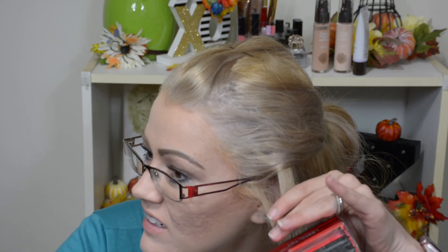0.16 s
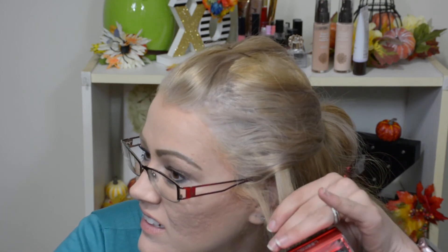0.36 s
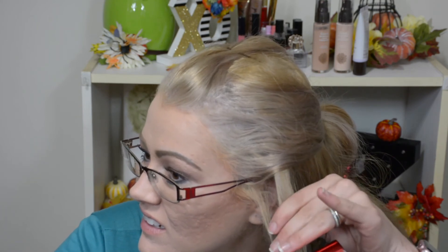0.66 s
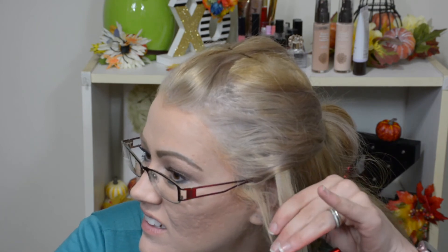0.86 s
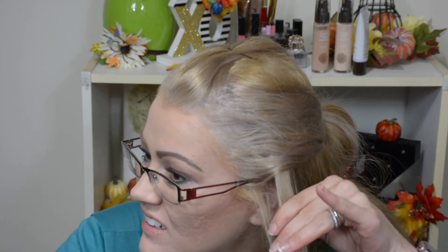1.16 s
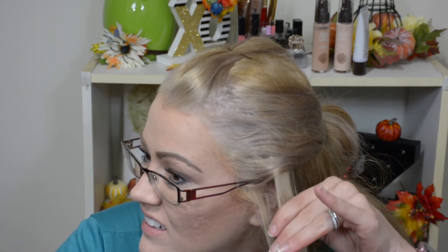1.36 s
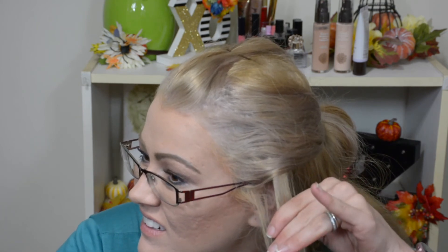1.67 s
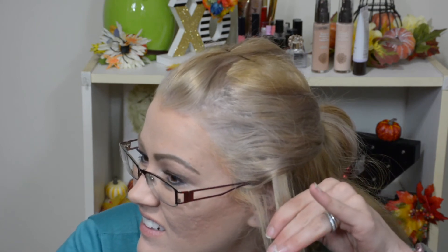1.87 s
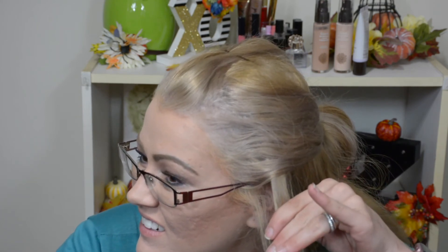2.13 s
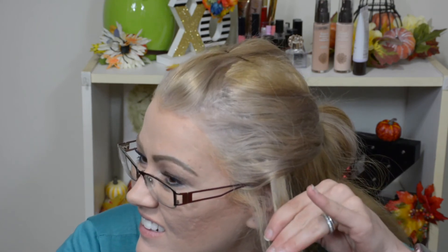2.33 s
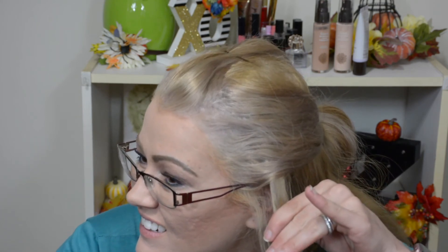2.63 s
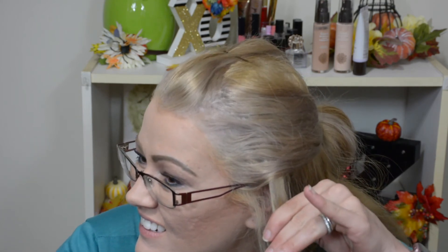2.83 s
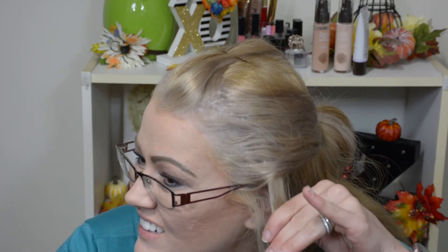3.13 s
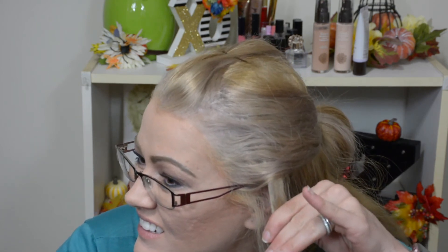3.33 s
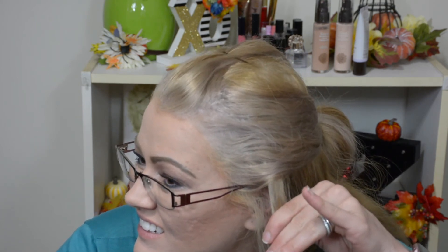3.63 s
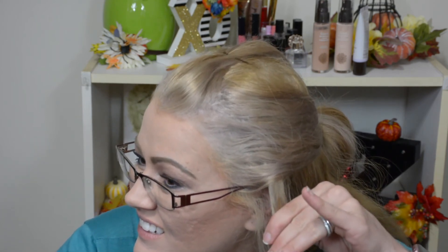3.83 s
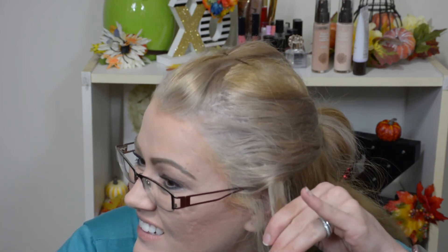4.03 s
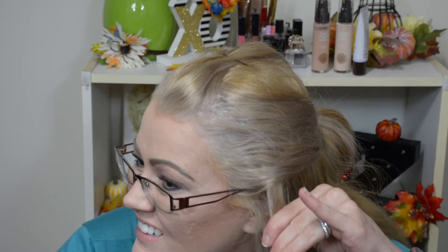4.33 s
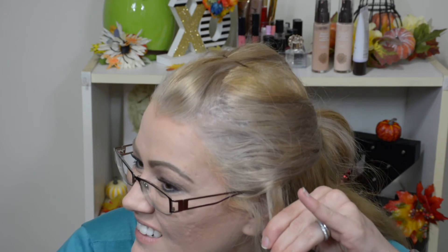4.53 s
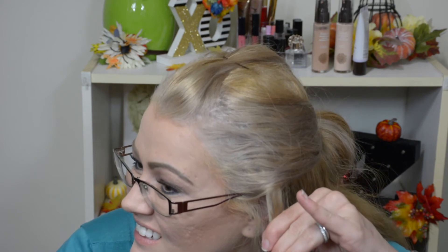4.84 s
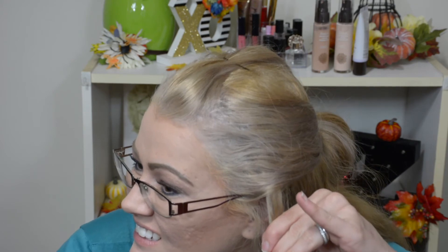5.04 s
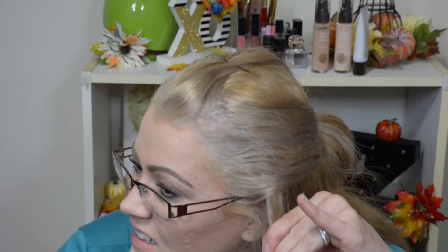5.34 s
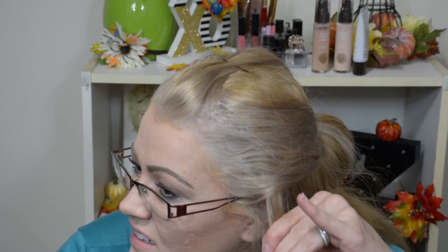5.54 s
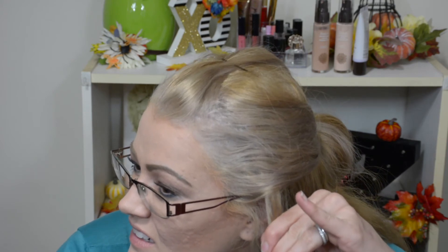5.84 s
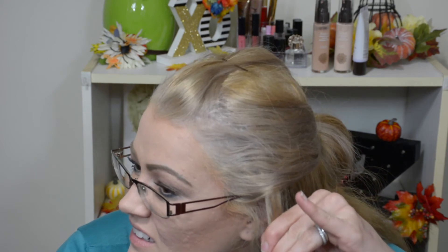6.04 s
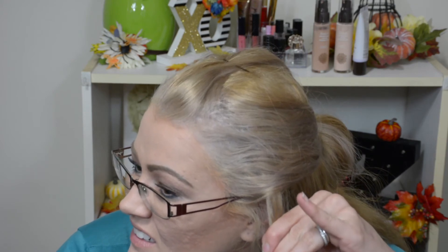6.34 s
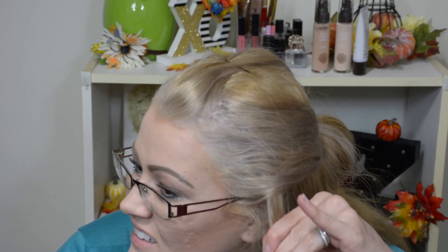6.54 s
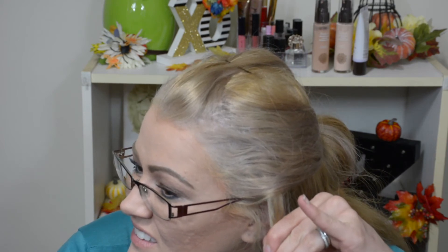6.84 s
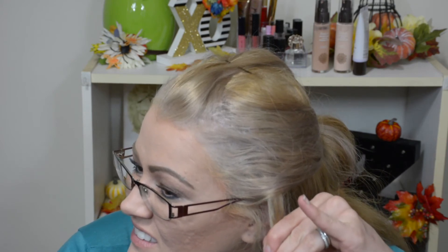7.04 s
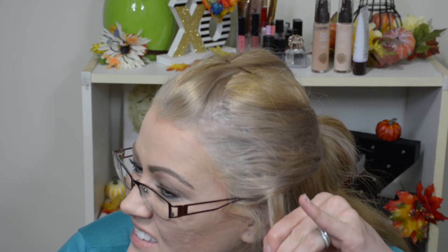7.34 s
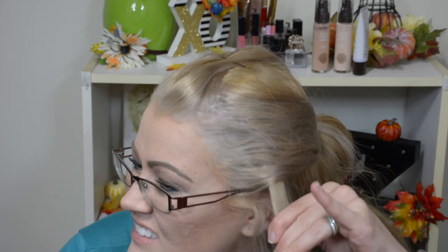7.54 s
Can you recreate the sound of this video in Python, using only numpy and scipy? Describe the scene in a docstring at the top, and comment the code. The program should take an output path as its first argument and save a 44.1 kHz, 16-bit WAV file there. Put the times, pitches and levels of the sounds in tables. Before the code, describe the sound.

A small cordless hair trimmer buzzes steadily with a bright, raspy whine in a quiet room, shifting slightly in tone as it is pressed and moved.

```python
"""A cordless hair trimmer hums and rasps in a quiet room with a rumble and a faint low hum that swells at times.
It runs free for the first second, is pressed to the neck by two, glides from four, tilts after six and lifts at
the end. A cam drives the blade to and fro, so every part hums on multiples of the stroke rate; gears add lines at
thirds and quarters, the teeth rasp three times a stroke and the blade knocks once.
The hold changes which multiples stand out and how loud each part is; the speed drifts along with it."""
import sys
import numpy as np
from scipy import signal
from scipy.fft import rfft, irfft, next_fast_len
from scipy.io import wavfile
from scipy.ndimage import uniform_filter1d, map_coordinates

SR = 44100
rng = np.random.default_rng(int(sys.argv[2]) if len(sys.argv) > 2 else 0)


def unload_audio(sound):
    """Save the sound as a 16-bit wav file, at the path given as the first command line argument."""
    columns = np.transpose(np.atleast_2d(sound))
    # keep every value between -1 and 1, then stretch to whole-number steps
    steps = np.round(np.clip(columns, -1, 1) * 32767)
    wavfile.write(sys.argv[1], SR, steps.astype(np.int16))


N = 339407
STROKES, POINTS = 12, 1024  # strokes in one full gear pattern, samples a stroke


def amp(db):
    """Turn dB into a plain factor."""
    return 10 ** (np.asarray(db) / 20)


def unit(x):
    """Scale x to an rms of 1."""
    return x / np.sqrt(np.mean(x ** 2) + 1e-20)


def steady(x, seconds):
    """Even out x to a running rms of 1."""
    return x / np.sqrt(np.abs(uniform_filter1d(x ** 2, int(seconds * SR))) + 1e-20)


def along(points, hz, column=1):
    """Read a table of (Hz, value, ..) on a log frequency axis."""
    p = np.transpose(points)
    return np.interp(np.log(hz + 1), np.log(p[0] + 1), p[column])


def curves(rows):
    """Draw one value per sample for each column after the time."""
    seconds, *columns = np.transpose(rows)
    return [np.interp(np.arange(N) / SR, seconds, c) for c in columns]


def wobble(rate):
    """A smooth random curve with rate knots a second."""
    return map_coordinates(rng.standard_normal(int(N * rate / SR) + 4), [np.arange(N) * rate / SR])


def filtered(x, response):
    """Shape the spectrum of x by a response that depends on frequency."""
    m = next_fast_len(N + 8192)
    return irfft(rfft(x, m) * response(np.fft.rfftfreq(m, 1 / SR)), m)[..., :N]


def coloured(x, spectrum):
    """Give x the spectrum of a table, at an rms of 1."""
    return unit(filtered(x, lambda hz: amp(along(spectrum, hz))))


# How fast the blade goes. Each row: time in seconds, speed in strokes per second.
SPEED = [(0.0, 67.7), (0.08, 67.8), (1.11, 67.8), (1.82, 67.1), (2.1, 65.8), (2.23, 65.6), (2.55, 66.1),
         (2.7, 65.4), (3.19, 66.0), (3.81, 65.2), (4.0, 66.4), (4.67, 67.3), (5.29, 66.6), (6.06, 67.3),
         (6.23, 67.2), (6.3, 66.4), (6.68, 66.3), (6.79, 66.8), (7.19, 66.2), (7.52, 66.7), (7.63, 66.1),
         (7.69, 66.1)]
RATE = np.mean(SPEED, axis=0)[1]  # average of the table, in strokes per second
WHEEL_TURNS = .246  # turns of the slow gear wheel a stroke
WHEEL_PLAY = .0009  # lead and lag it gives the blade, in strokes


def stroke_motion():
    """Count strokes over time; a slow gear wheel that runs out of true makes the blade lead and lag."""
    stroke = np.cumsum(curves(SPEED)[0] * (1 + .0003 * wobble(25))) / SR
    wheel = np.sin(2 * np.pi * WHEEL_TURNS * stroke)
    return stroke + WHEEL_PLAY * wheel, wheel


def played(table, stroke):
    """Loop a table of whole strokes in step with the blade."""
    return map_coordinates(table, [stroke * POINTS], mode="grid-wrap", order=1)


# How the tool is held. Each row: time in seconds, hold (0 free, 1 pressed, 2 gliding, 3 tilted, 4 lifted).
HOLD = [(1.1, 0), (1.88, .5), (1.96, 1.5), (3.85, 1), (4.05, 2), (6.2, 2), (6.32, 3), (7.54, 3), (7.59, 4)]


def shares():
    """How much of each of the five holds is heard, blending between neighbours."""
    hold, = curves(HOLD)
    return np.clip(1 - np.abs(hold - np.arange(len(KNOCK))[:, None]), 0, 1)


# The cam's hum. Each row: multiple of the stroke rate, relative level in dB.
CAM = [(1, -47.0), (2, -48.5), (3, -45.5), (4, -45), (5, -35.5), (6, -31), (7, -21.5), (8, -30), (9, -22.5),
       (10, -24.5), (11, -27), (12, -35.5), (13, -28), (14, -22), (15, -23), (16, -17.0), (17, -10.5),
       (18, -15), (19, -12), (20, -21), (21, -8.5), (22, -8), (23, -12), (24, -12.5), (25, -9.5), (26, -7),
       (27, -7.5), (28, -7.5), (29, -10.5), (30, -10.5), (31, -11.5), (32, -16), (33, -8.5), (34, -15.5),
       (35, -10), (36, -11.5), (37, -5.5), (38, -17.5), (39, -12.5), (40, -14.5), (41, -20.5), (42, -15),
       (43, -18.5), (44, -21.5), (45, -4.5), (46, -7), (47, -14.5), (48, -13), (49, -4.5), (50, -11.5),
       (51, -3.5), (52, -6.5), (53, -17.5), (54, -18.5), (55, -8), (56, -5), (57, -11.5), (58, -15.5),
       (59, -10.5), (60, -27), (61, -17), (62, -11.5), (63, -11), (64, -19.5), (65, -21.5), (66, -18.5),
       (67, -12.5), (68, -24.5)]
# Multiples each hold lifts or damps, one list per hold. Each row: multiple of the stroke rate, change in dB.
SHIFTS = [
    [(7, 2.0), (11, -6.5), (21, 6), (22, 2), (26, -2.5), (27, -3.5), (30, -3.5), (31, 3), (36, -6), (42, 2),
     (43, 9), (44, 10.5), (49, 0), (54, 9), (56, -10), (57, 0.5), (63, -8), (68, 3)],
    [(10, 3.5), (11, 5), (16, -4.5), (20, -7.0), (21, -8.5), (22, -4.5), (25, 2), (27, 6.5), (32, -2),
     (33, -8.5), (36, -7.0), (40, 5), (45, -3), (46, -20), (52, 5.5), (53, -3), (54, -17), (55, 2.5)],
    [(9, 2), (10, -2.0), (14, 2.5), (15, 4.5), (19, 4), (20, 2), (21, 2.0), (22, -0.5), (24, -10.0),
     (25, -9.5), (26, 2.5), (29, -5), (43, 5), (45, 0.5), (51, 2.5), (53, -10), (55, -5), (58, 7)],
    [(7, -3), (8, 5.5), (9, -1.5), (11, 2.5), (12, 12), (16, 6.5), (18, -6), (19, 3.5), (23, 5.5), (24, -9),
     (25, -9), (33, -4), (40, 4.5), (50, -14), (51, 6), (52, -8), (61, 5.0), (64, 11.5)],
    [(12, 12), (18, 13.5), (20, 4), (21, -12), (26, -3), (27, -8.0), (34, -6.0), (38, 3), (42, -7.0),
     (45, -1), (48, 7), (49, 0), (50, 3.0), (55, 8), (56, -2.5), (57, 6), (62, -3), (67, -11.0)],
]


def held(shifts):
    """The cam's multiples as one hold colours them."""
    orders = np.array(CAM, float)
    k, db = np.transpose(shifts)
    orders[np.rint(k).astype(int) - 1, 1] += db
    return orders


def trend(orders, hz):
    """The broad outline of the multiples: their power averaged over four neighbours, in dB."""
    k, db = np.transpose(orders)
    return np.interp(hz / RATE, k, 10 * np.log10(uniform_filter1d(amp(2 * db), size=4)))


def low_lift(hz, gear_db):
    """Change gears and friction by gear_db up to the top of the handle's range."""
    return gear_db * (hz < RANGES[1][1])


# Gear lines against the outline of the cam's hum.
# Each row: frequency in Hz, lines at thirds of the stroke rate in dB, lines at odd quarters in dB.
GEARS = [(250, -33, -46), (600, -14, -20), (1500, -16, -20), (2500, -17, -20), (3500, -14, -17),
         (4600, -12, -15)]
# How much of the vibration lines up as one knock a stroke: one share from 0 to 1 for each hold.
KNOCK = [.25, .88, .6, .6, .8]
# What a knock rings, housing then blade. Each row: lowest multiple, centre multiple, half-width in multiples,
# delay in strokes, part of the knock's share.
STRUCK = [(15, 26, 3, .17, .75), (42, 52, 5, 0, 1)]


def cam_and_gears(orders, knock, phases, gear_db):
    """Twelve strokes of vibration: after these, cam and both gears are back where they began."""
    at = np.arange(len(phases))  # twelfths of the stroke rate
    multiple = at / STROKES
    hz = multiple * RATE
    thirds, quarters = at % 4 == 0, (at % 3 == 0) & (at % 6 > 0)
    level = np.where(quarters, along(GEARS, hz, column=2), -120)
    level = np.where(thirds, along(GEARS, hz), level)
    level = level + trend(orders, hz) + low_lift(hz, gear_db) + rng.normal(0, 3, len(at))
    k, db = np.transpose(orders)
    level[k.astype(int) * STROKES] = db
    turn = phases
    for lowest, centre, half, delay, part in STRUCK:
        aligned = np.clip(knock * part, 0, 1) * (at % STROKES == 0)  # gear lines stay spread over the stroke
        ring = np.arctan((multiple - centre) / half) / (2 * np.pi)  # lag of a struck resonance
        struck = (1 - aligned) * phases - aligned * ring - multiple * delay
        turn = np.where(multiple > lowest, struck, turn)
    knock_place = TEETH[2][0]  # the knock is timed from the last tooth contact
    lines = amp(level) * np.exp(2j * np.pi * (turn - multiple * knock_place))
    return irfft(lines, STROKES * POINTS) * STROKES * POINTS / 2


# Friction under the multiples. Each row: frequency in Hz, level against the outline of the cam's hum in dB.
RUSH = [(250, -40), (600, -21.5), (1200, -26.5), (2000, -13), (3000, -15.5), (4600, -9.5)]


def friction(rub, orders, gear_db):
    """Rubbing noise that follows the outline of the cam's hum."""
    return filtered(rub, lambda hz: amp(trend(orders, hz) + along(RUSH, hz) + low_lift(hz, gear_db)))


def vibration(stroke, touch, weights):
    """Cam, gears and friction together, blended from hold to hold."""
    phases = rng.uniform(-0.54, 0.61, len(CAM) * STROKES + 1)  # in turns
    rub = unit(rng.standard_normal(N) * (1 + 0.97 * touch)) * np.sqrt(SR / RATE)
    drive = 0
    for w, shifts, knock, (*_, gear_db) in zip(weights, SHIFTS, KNOCK, HELD):
        orders = held(shifts)
        hum = played(cam_and_gears(orders, knock, phases, gear_db), stroke)
        drive = drive + w * (hum + friction(rub, orders, gear_db))
    return drive


# Range of each part: motor, handle, housing, comb, blade. Each row: lowest Hz, highest Hz.
RANGES = [(230, 430), (430, 850), (850, 2200), (2200, 2800), (2800, 4700)]
# One row per hold: motor level in dB, housing level in dB, comb level in dB,
# change of gear lines and friction up to the top of the handle's range in dB.
HELD = [(-68, -35, -44, -3), (-71, -35.5, -40, 1.5), (-67.5, -38, -42, 3), (-69, -38.5, -39.5, 7.5),
        (-66, -36, -35.5, -1)]
# Loudness of the handle. Each row: time in seconds, level in dB.
HANDLE = [(0.0, -55), (0.08, -56), (0.26, -50), (1.88, -52), (2.16, -56), (4.54, -56), (6.92, -63),
          (7.32, -62), (7.69, -49)]
# Loudness of the blade before its throb. Each row: time in seconds, level in dB.
BLADE = [(0.0, -34), (0.21, -35), (1.71, -37), (2.18, -32), (2.91, -32.5), (3.17, -33.5), (3.36, -31),
         (3.83, -31), (5.08, -34.5), (5.35, -33.5), (5.4, -33.5), (6.0, -33.5), (6.17, -34.5), (6.66, -31),
         (6.79, -33.5), (7.09, -31.5), (7.52, -31), (7.69, -28.5)]


def body(drive, weights, throb_db):
    """Five parts of the tool each radiate their own range of the vibration, at a level that wavers a little."""
    (handle_db,), (blade_db,) = curves(HANDLE), curves(BLADE)
    motor_db, housing_db, comb_db, _ = np.transpose(HELD) @ weights
    levels = motor_db, handle_db, housing_db, comb_db, blade_db + throb_db
    out = 0
    for (lo, hi), db in zip(RANGES, levels):
        part = steady(filtered(drive, lambda hz: (hz >= lo) & (hz < hi)), 0.14)
        out = out + amp(db + 0.39 * wobble(12)) * part
    return out


# Tooth contacts. Each row: place in the stroke from 0 to 1, seconds for the scrape to die by 60 dB,
# then relative level in dB when free, pressed, gliding, tilted, lifted.
TEETH = [(0.342, 0.0083, -1, 4, 0, 0, -2), (.56, 0.016, -12, -6, -9, -6.5, -12),
         (.86, 0.018, -12, 3, -1, 2, -1)]


def contacts(stroke, weights):
    """Pressure of tooth on tooth: a sharp tick at each contact, then a dying scrape."""
    out = np.zeros(N)
    for place, t60, *db in TEETH:
        age = (stroke - place + 1) % 1 / RATE  # seconds since the contact
        scrape = amp(-60 * age / t60)
        tick = 0.55 * amp(-60 * age / 0.0017)
        out += amp(np.dot(db, weights)) * (scrape + tick)
    return out


# Colour of the rasp. Each row: frequency in Hz, relative level in dB per Hz.
RASP = [(2760, -36), (4700, -4.5), (5440, -7.5), (6220, -12.5), (7240, -15), (7960, -14), (8620, -13.5),
        (12400, -20.5), (14500, -26), (15600, -27)]
# Loudness of the rasp before its throb. Each row: time in seconds, level in dB.
TREBLE = [(0.0, -45.5), (1.24, -45.5), (2.03, -42), (3.79, -43.5), (4.6, -42.5), (5.27, -43), (5.91, -43.5),
          (7.41, -44.5), (7.69, -43)]


def teeth_rasp(stroke, touch, weights, throb_db):
    """Gritty noise pulsed by the tooth contacts, partly the same each time the same teeth meet."""
    def repeat(strokes):
        return played(rng.standard_normal(strokes * POINTS), stroke)

    # the same teeth meet on every stroke, the same gear teeth on every third and fourth
    same = sum(np.sqrt(w) * repeat(1) for w in weights)
    same = same + 0.45 * repeat(3) + 0.96 * repeat(4)
    grit = rng.standard_normal(N) * amp(2.6 * wobble(3000)) + 1.53 * same
    slide = filtered(grit, lambda hz: 0.53 / (1 + (hz / 8000) ** 2))  # sliding between contacts is duller
    rasp = steady(coloured(grit * touch + slide, RASP), 0.28)
    return amp(curves(TREBLE)[0] + throb_db) * rasp


# Bands that swell or dip: resonances of the tool's body below, reflections off hand and neck in the treble.
# Each row: start in seconds, end in seconds, centre at the start in Hz, centre at the end in Hz, width in Hz,
# greatest change in dB.
BANDS = [(-.2, 0.26, 865, 860, 49, 13), (-.4, .9, 7400, 7200, 450, 6), (0, 1.4, 12000, 12300, 600, 6),
         (1, 3.4, 1530, 1950, 98.6, 4.5), (1.1, 3.7, 7700, 8100, 300, 6),
         (1.601, 4.7, 13300, 13700, 600, 5), (2, 5.9, 1320, 1650, 80, -5), (2.6, 4.9, 4800, 5400, 200, 3),
         (2.802, 3.2, 2330, 2290, 49.6, 8.5), (2.8, 4.8, 14100, 14400, 500, 5),
         (3.9, 4.8, 1760, 1730, 71, 5.5), (4.1, 5.8, 2460, 2480, 50, 9.5), (4.8, 7.6, 5354, 5580, 150, 5),
         (6.4, 7.6, 8100, 8200, 198, 3), (7.58, 7.65, 2450, 2410, 90, 8), (1, 2, 1120, 1130, 100, 3),
         (1.95, 2.7, 1490, 1490, 80.6, 6.5), (2, 3.2, 3420, 3430, 40, 3), (3.3, 4, 2620, 2620, 150, 1.5),
         (6.8, 8.2, 2400, 2450, 71, 3), (.15, .75, 2510, 2510, 40, 9), (.3, 1.4, 2240, 2240, 40, 5),
         (.4, .95, 2180, 2160, 90, 5), (3.3, 3.4, 3680, 3600, 150.5, 1.5), (4.8, 6.3, 3890, 3870, 60, 2),
         (4.8, 6.3, 970, 970, 60, 4.5), (5.1, 5.8, 3020, 3000, 80, 4), (4.9, 5.7, 3250, 3250, 50, 4),
         (5, 5.6, 3450, 3430, 60, -4), (-.3, .6, 3580, 3580, 60, 5)]


def swelling_bands(x, patchy_db):
    """Body resonances below and reflections in the treble lift or dip narrow bands, many of which drift."""
    hz, t, z = signal.stft(x, SR, nperseg=1024)
    field = uniform_filter1d(rng.standard_normal(z.shape), size=6, axis=0)
    field = uniform_filter1d(field, size=70, axis=1)
    db = patchy_db * unit(field) * (hz[:, None] > 4700)  # short waves reflect in finer detail
    for start, end, from_hz, to_hz, width_hz, peak_db in BANDS:
        u = np.clip((t - start) / (end - start), 0, 1)
        off = (hz[:, None] - from_hz - u * (to_hz - from_hz)) / width_hz
        db += peak_db * np.sqrt(np.abs(np.sin(np.pi * u))) * np.exp(-off ** 2)
    return signal.istft(z * amp(db), SR, nperseg=1024)[1][:N]


def trimmer():
    """Cam, gears and friction shake the tool's five parts, and the teeth rasp above them."""
    stroke, wheel = stroke_motion()
    weights = shares()
    touch = contacts(stroke, weights)
    throb_db = 20 * np.log10(1 + .1 * wheel)  # the slow wheel swings blade and teeth by a tenth
    hum = body(vibration(stroke, touch, weights), weights, throb_db)
    rasp = teeth_rasp(stroke, touch, weights, throb_db)
    return swelling_bands(hum + rasp, patchy_db=1.52)


# Colour of the room's rumble. Each row: frequency in Hz, relative level in dB per Hz.
ROOM = [(12, -44), (20, -19), (59, 2.5), (91, -0.5), (150, 0.5), (226, -1), (268, 1), (300, -5), (390, -36),
        (660, -120)]


def room_rumble():
    """Steady low noise with the room's colour."""
    return amp(-77.5) * coloured(rng.standard_normal(N), ROOM)


# When the low hum swells. Each row: middle in seconds, half-length in seconds, rise in dB.
HUM_SWELLS = [(0.248, .2, 8), (2.85, .4, 13), (3.7, .25, 7.5), (5.95, .3, 9), (7.6, .2, 8.5)]


def low_hum():
    """Noise in a narrow band around 155 Hz that wavers and swells now and then."""
    hum = unit(filtered(rng.standard_normal(N), lambda hz: np.exp(-((hz - 155) / 20) ** 2)))
    t = np.arange(N) / SR
    swell_db = sum(db * np.exp(-((t - s) / half) ** 2) for s, half, db in HUM_SWELLS)
    return amp(-88.5 + swell_db + 1.5 * wobble(1.5)) * hum


def scene():
    """The trimmer over the room's rumble and low hum."""
    return (trimmer() + room_rumble() + low_hum())[None]


def record(dry):
    """Keep nothing at or above the band limit of 15750 Hz."""
    return filtered(dry, lambda hz: hz < 15750)


dry = scene()
out = record(dry)
unload_audio(out)
```